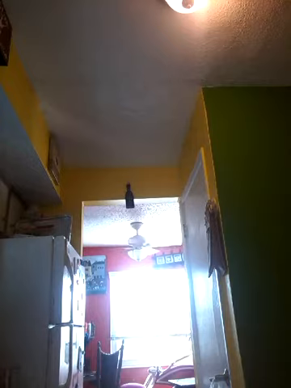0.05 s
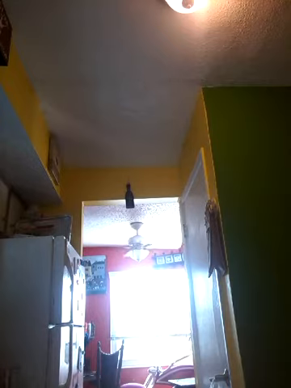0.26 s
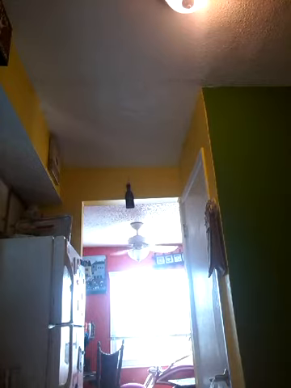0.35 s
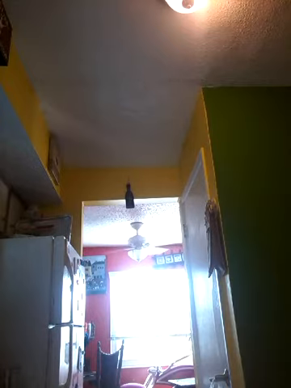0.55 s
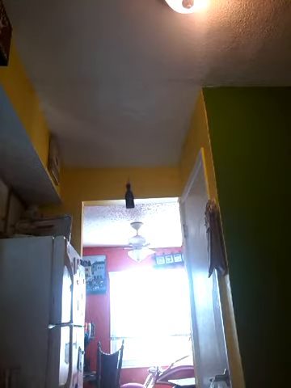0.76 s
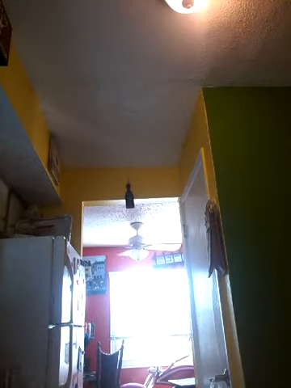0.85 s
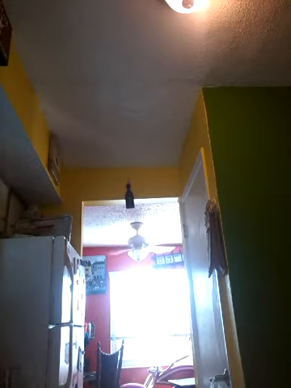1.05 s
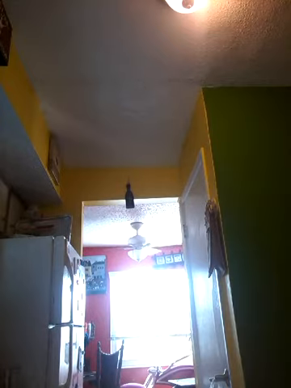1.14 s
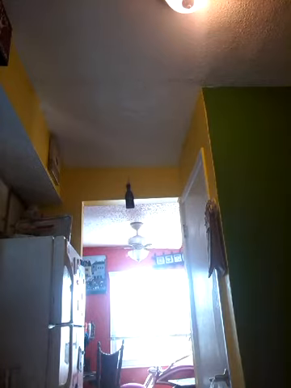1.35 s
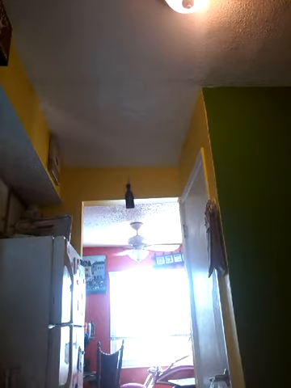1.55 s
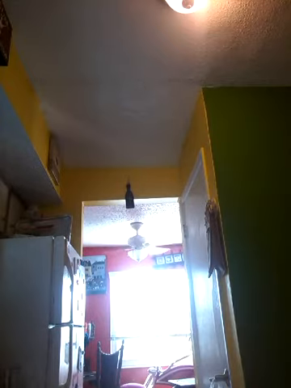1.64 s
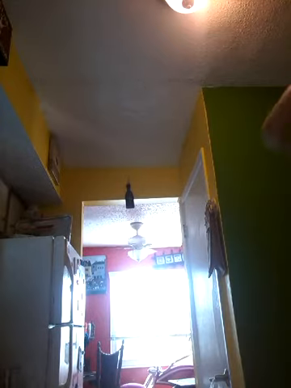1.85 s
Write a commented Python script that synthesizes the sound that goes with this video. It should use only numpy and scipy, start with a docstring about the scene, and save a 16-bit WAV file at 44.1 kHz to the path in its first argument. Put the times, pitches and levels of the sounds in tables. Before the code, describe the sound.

Hollow wooden thuds and sharp knocks come in quick clusters with light metallic rattles, then a rough sliding scrape ends in a clack; short hard room reverberation, stereo, with faint low room noise afterwards.

```python
"""A wooden kitchen drawer bumps and booms as someone rummages in it, a few steps from the microphone.
Jolts are short sine booms with box modes; knocks are coloured clicks that set the contents ringing.
Utensils clink as close dying sines and rattle as flurries of tiny impacts. The runners rub, scrape
and hiss as dense random slips; the drawer slides shut with a clack.
A small hard kitchen smears every contact, over faint room noise and a low rumble."""
import sys
import numpy as np
from scipy import signal
from scipy.fft import rfft, irfft
from scipy.io import wavfile
from scipy.ndimage import uniform_filter1d

SR = 44100
rng = np.random.default_rng(int(sys.argv[2]) if len(sys.argv) > 2 else 0)


def waveform_to_disk(signal):
    """Save audio, clipped to [-1, 1], as 16-bit WAV at the path in sys.argv[1]."""
    frames = np.transpose(np.atleast_2d(signal))
    scaled = np.clip(frames, -1, 1) * 32767
    samples = np.round(scaled).astype(np.int16)
    wavfile.write(sys.argv[1], SR, samples)


N = 83790  # length in samples, 1.9 s


def amp(db):
    """Decibels to gain."""
    return 10 ** (np.asarray(db) / 20)


def read(points, hz):
    """Reads a spectrum on a log-frequency axis."""
    f, value = np.transpose(points)
    return np.interp(np.log(hz + 1), np.log(f + 1), value)


def level(points, column=1):
    """A dB curve over time as a gain for each sample."""
    rows = np.array(points)
    return amp(np.interp(np.arange(N) / SR, rows[:, 0], rows[:, column]))


def evened(x):
    """Scales to rms 1."""
    return x / np.sqrt(np.mean(x ** 2) + 1e-20)


def unit(x):
    """Scales to a mean energy of 1 per channel."""
    return x / np.sqrt(np.sum(x ** 2) / len(np.atleast_2d(x)) + 1e-20)


def add(mix, s, sound):
    """Mixes a sound in at a time in seconds."""
    start = max(round(s * SR), 0)
    part = mix[..., start:][..., :sound.shape[-1]]
    part += sound[..., :part.shape[-1]]


def convolve(x, response):
    """Passes a sound through a response."""
    return signal.fftconvolve(np.atleast_2d(x), np.atleast_2d(response), axes=1)[:, :N]


def click(points, size=2048):
    """A minimum-phase click: the given spectrum with its energy as early as possible."""
    hz = abs(np.fft.fftfreq(size, 1 / SR))
    log_gain = np.log(amp(read(points, hz)))
    spectrum = np.exp(np.conj(signal.hilbert(log_gain)))
    return np.fft.ifft(spectrum).real[:size // 2]


def ring(modes):
    """Half a second of the dying sines of a struck object."""
    t = np.arange(SR // 2) / SR
    out = np.zeros(len(t))
    for hz, db, t60 in modes:
        decay = np.exp(-np.log(1000) * t / t60)
        out += amp(db) * decay * np.sin(2 * np.pi * hz * t)
    return out


def contacts(size, rate, spread_db):
    """Random tiny impacts of either sign and uneven strength, at a mean rate per second."""
    chance, sign, strength = rng.random((3, size))
    heights = amp(-spread_db * np.log(strength + 0.06))
    return (chance < rate / SR) * np.sign(sign - .5) * heights


def bumps():
    """The drawer box jolts: each jolt booms briefly and leaves the wooden box ringing."""
    # jolts: t/s, level/dB, f/Hz of the boom, box ringing relative to the jolt/dB
    jolts = [(.043, -37.5, 316, 9), (.070, -27, 320, 6.5), (0.13, -54, 286, 0), (.227, -18, 346, -1),
             (.265, -25, 299, 5), (0.343, -29.5, 316, 16), (.377, -16.5, 238, -8), (0.3932, -9, 318, -2),
             (0.423, -29, 192.5, -24), (0.443, -17.5, 190, 2), (.456, -19, 272, 8.5),
             (.476, -18.5, 173, 6.5), (.499, -15.5, 302, -0.5), (0.564, -29.5, 273, -9),
             (0.599, -33.5, 314, 7), (0.648, -20, 298, -1), (0.655, -31, 195, -27), (0.674, -17, 198, -7),
             (.697, -19.5, 310, 5), (.713, -16.5, 311, -29), (.731, -14.5, 305, 2.5), (.885, -22, 303, 6.5),
             (.945, -26, 284, -35), (0.965, -24, 242, 2.5), (1.067, -26, 504, -14), (1.250, -18, 312, -35),
             (1.439, -67, 256, 1)]
    # modes of the box: f/Hz, level/dB, t60/s
    box_modes = [(129, -21.5, 0.38), (178.2, -13.5, 0.25), (280, -62, 0.18), (318, -14, 0.46),
                 (330, -24, 0.16), (403.4, -20.5, .25), (471, -24.5, 0.19)]
    rise_s, fall_s = 0.0048, 0.0059
    wet_db, low_cut_hz = -11, 141

    out, box = np.zeros((2, N)), ring(box_modes)
    t = np.arange(len(box)) / SR
    swell = np.minimum(t / rise_s, 1) / (1 + (t / (rise_s + fall_s)) ** 4)
    for s, db, hz, ring_db in jolts:
        boom = swell * np.sin(2 * np.pi * hz * t)
        echo = unit(convolve(boom, kitchen()))[:, :len(t)] * np.linalg.norm(boom)
        add(out, s, amp(db) * (boom + amp(ring_db) * box + amp(wet_db) * echo))
    low_cut = signal.butter(3, low_cut_hz, "high", fs=SR, output="sos")
    return signal.sosfilt(low_cut, out)


def knocks(gain_db=37):
    """Hard contacts on wood, each a click of its own colour, set the drawer's contents ringing."""
    # blows, ahead of the common gain: t/s, thud/dB, body/dB, crack/dB, tick/dB
    blows = [(.062, -44.5, -38.5, -59, -61), (0.072, -64, -39, -54.5, -61), (0.092, -50, -48, -55, -65),
             (0.17, -68, -51, -62, -56.5), (.224, -32.5, -31.5, -35.5, -39), (0.379, -24, -28.5, -54, -66),
             (.393, -33, -25, -56.5, -52), (.412, -19.5, -21, -55, -56), (0.449, -54, -31, -31, -50.5),
             (0.4563, -35.5, -26.5, -35.5, -57), (.467, -39, -42, -53, -64), (0.502, -41, -33, -48, -67),
             (.507, -59, -34, -51, -64), (0.646, -44.5, -32, -30, -58), (.649, -28.5, -23.5, -24.5, -46.5),
             (.655, -29, -20.5, -26, -36.5), (.661, -46.5, -27.5, -27.5, -47), (0.679, -49, -24, -31, -61),
             (.735, -39.5, -23, -36, -46), (0.783, -66, -24.5, -40, -36), (.883, -67.5, -22, -41, -53),
             (.969, -36.5, -28.5, -40, -53), (1.005, -68, -25.5, -36, -61), (1.221, -79, -26.5, -23, -61),
             (1.249, -28, -23, -23, -36.5), (1.2538, -26.5, -28, -21, -32),
             (1.500, -55.5, -54.5, -54, -58.5)]
    # centres of thud, body, crack and tick: f/Hz
    band_hz = [150, 750, 2400, 8000]
    # shared colour of struck wood: f/Hz, level/dB
    wood = [(30, -45), (70, -24), (120, 8), (200, 7.5), (500, 6.5), (1000, 3), (2000, 1), (3500, -5.5),
            (5500, -4.5), (7800, -12.5), (10500, -9.5), (16000, -24)]
    # what rings on inside the drawer: f/Hz, relative level/dB, t60/s
    contents = [(558, 0, .3), (646, -2, .27), (921, -8, .15), (1020, -8, .15), (1098, -7, .15),
                (1190, -4, .17), (1543, -6, .13), (1890, -6, .14), (2050, -6, .14), (2174, -5, .15),
                (2571, -8, .17), (3367, -16, .15), (5290, -18, .25), (5520, -16, .28)]
    contents_db = -23  # relative to the blow

    out, rings = np.zeros((2, N)), amp(contents_db) * unit(ring(contents))
    for s, *band_db in blows:
        blow = convolve(click(wood), click(list(zip(band_hz, band_db))))
        sound = convolve(blow, kitchen())
        add(out, s, sound)
        add(out, s, convolve(sound, rings))
    return amp(gain_db) * out


def clinks():
    """Struck utensils ring in tight clusters of modes that beat together."""
    # strikes: t/s, f/Hz, level/dB
    strikes = [(.228, 1020, -34.5), (.228, 2140, -34), (.503, 905, -32.5), (.738, 1200, -38.5),
               (.885, 745, -31), (0.459, 1380, -38), (.995, 1140, -33), (1.005, 2080, -38),
               (1.256, 1200, -27), (1.256, 5460, -47)]
    # close modes of one utensil: multiple of the pitch, level/dB
    split = [(.968, -4), (.988, -2), (1, 0), (1.016, -3)]
    # decay by pitch: f/Hz, t60/s
    decay = [(800, .19), (2000, .22), (5500, .37)]

    out = np.zeros((2, N))
    for s, hz, db in strikes:
        t60 = read(decay, hz)
        tone = ring([(hz * ratio, d, t60) for ratio, d in split])
        near = unit(convolve(tone, kitchen(size=512)))  # only the first 12 ms of the room
        add(out, s, amp(db) * np.linalg.norm(tone) * near)
    return out


def rattles():
    """Utensils jostle: short flurries of bright random clicks, fading over their second half."""
    # flurries: t/s, length/s, level/dB, treble tilt/(dB per octave)
    flurries = [(0.221, 0.017, -33, 2), (0.232, .035, -36.5, -6), (0.296, 0.24, -49.5, -2),
                (0.379, 0.022, -40.5, 0), (0.693, 0.043, -40, 0.5), (0.73, 0.011, -36, 5.5),
                (0.755, .02, -37.5, -4), (0.789, 0.0073, -40, 5.5), (0.889, 0.038, -41.5, 0.5),
                (0.939, 0.028, -49, -2), (0.99, 0.084, -48.5, 2), (1.07, 0.053, -48, -2.5),
                (1.154, 0.036, -37.5, -8.5)]
    # colour of the utensils: f/Hz, level/dB
    utensils = [(200, -41), (900, 6), (2000, 1.5), (3500, 2), (5500, 3.5), (7800, -6), (10500, -6),
                (13000, -9.5), (16000, -16)]
    rate_per_s, spread_db = 630, 2

    out = np.zeros((2, N))
    t = np.arange(SR // 8) / SR
    for s, length, db, tilt_db in flurries:
        fade = np.clip(2 * (1 - t / length), 0, 1)
        flurry = contacts(len(t), rate_per_s, spread_db) * fade
        # the tilt pivots at 6 kHz
        colour = click([(hz, d + tilt_db * np.log2(hz / 6000)) for hz, d in utensils])
        sound = unit(convolve(convolve(flurry, colour), kitchen()))
        add(out, s, amp(db) * np.sqrt((length + 0.011) * SR) * sound)  # longer flurries carry more energy
    return out


def slide():
    """Friction of the runners: tiny random slips make a hollow resonant rub, a scrape and a hiss."""
    # levels ahead of the mix and the room: t/s, rub/dB, scrape/dB, hiss/dB
    friction = [(0, -52.5, -62.5, -89), (.16, -70, -68, -86), (.195, -48.5, -48.5, -84),
                (.22, -42.5, -41, -37.5), (.26, -40.5, -39, -44.5), (.32, -51, -50, -63),
                (.43, -48, -43.5, -58), (.52, -53, -68, -75), (.55, -59, -92, -97), (.87, -66, -55, -77),
                (.92, -43, -71, -74), (.955, -34.5, -44.5, -56), (1.01, -34, -42.5, -47),
                (1.045, -35.5, -41.5, -54), (1.14, -36.5, -41.5, -58), (1.165, -40, -33, -44),
                (1.21, -34, -30.5, -39), (1.25, -33, -30.5, -32.5), (1.265, -56, -53, -59),
                (1.6, -71.5, -74.5, -78)]
    # colour of the rub: f/Hz, level/dB
    runner = [(60, -31), (150, -10), (300, -5), (480, 5), (640, 5.5), (800, 1.5), (1100, 0), (1800, -13),
              (2600, -6.5), (5000, -24), (16000, -52)]
    # colour of the scrape: f/Hz, level/dB
    scrape_colour = [(200, -55), (900, -0.5), (1500, -1), (2900, -3.5), (4000, -14), (8000, -23.5),
                     (16000, -50)]
    # colour of the hiss: f/Hz, level/dB
    hiss_colour = [(500, -16), (3000, 4.5), (4400, -3), (5800, 5), (7800, -7), (10500, -3), (16000, -13.5)]
    # resonances of the sliding drawer: f/Hz, relative level/dB, t60/s
    drawer_modes = [(465, -2, .05), (525, -5, .06), (810, -2, .07), (1095, 2, .06), (1435, -1, .06),
                    (1840, 3, .05), (2060, 2, .05)]
    slips_per_s, spread_db = 1000, 2
    hollow_db = -1  # relative to the full rub

    layers = []
    for column, colour in enumerate([runner, scrape_colour, hiss_colour], 1):
        slips = convolve(contacts(N, slips_per_s, spread_db), click(colour))
        layers.append(evened(slips) * level(friction, column))
    rub, scrape, hiss = layers
    hollow = amp(hollow_db) * unit(convolve(rub, ring(drawer_modes))) * np.linalg.norm(rub)
    return convolve(rub / 2 + hollow + scrape + hiss, kitchen())


def kitchen(size=24576):
    """A small hard room: a weak direct sound, clumped early echoes, then a tail that dies by band."""
    # decay of the room: f/Hz, t60/s
    room_t60 = [(150, 0.47), (400, 0.21), (1040, 0.32), (2760, 0.27), (7280, 0.27), (15000, 0.16)]
    early_s, early_db, build_s = 0.013, -1.5, 0.0019  # early boost and build-up of the echoes
    clump_db, clump_fade_s = 3, 0.028
    direct_db = -15  # relative to all echoes together

    t = np.arange(size) / SR
    hz, when, z = signal.stft(pair(size), SR, nperseg=256)
    decay = amp(-60 * when / read(room_t60, hz)[:, None])
    tail = signal.istft(z * decay, SR)[1][:, :size]
    wander = evened(uniform_filter1d(rng.standard_normal(size), size=64))
    clumps = amp(clump_db * np.exp(-t / clump_fade_s) * wander)
    build = 1 - np.exp(-t / build_s)
    early = 1 + amp(early_db) * np.exp(-(t / early_s) ** 2)
    echoes = unit(tail * clumps * build * early)
    return echoes + amp(direct_db) * (t == 0)


def pair(size):
    """Diffuse noise at two microphones: alike in the bass, nearly unrelated in the treble."""
    # likeness of the channels: f/Hz, left-right correlation
    likeness = [(30, 0.99), (150, 1), (320, 0.97), (550, 0.19), (900, 0.13), (1900, -0.27), (4000, 0.038),
                (15000, -0.12)]
    a, b = rfft(rng.standard_normal((2, size)))
    same = np.clip(read(likeness, np.fft.rfftfreq(size, 1 / SR)), -1, 1)
    mid, side = a * np.sqrt((1 + same) / 2), b * np.sqrt((1 - same) / 2)
    return irfft([mid + side, mid - side], size)


def background():
    """Diffuse coloured noise: a steady room floor and a low rumble that swells and sinks."""
    # colour of the room noise: f/Hz, relative level/dB per Hz
    floor = [(15, -36), (25, -42), (53, -2.5), (71, -12.5), (107, 0.5), (160, -12.5), (227, -12),
             (389, -28), (469, -11.5), (582, -24), (848, -16.5), (919, -18.5), (15500, -37)]
    # level of the rumble: t/s, level/dB
    rumble_level = [(0, -53), (.15, -48), (.3, -37), (.6, -49.5), (.85, -37.5), (1.1, -45.5), (1.2, -44.5),
                    (1.35, -50), (1.5, -61), (1.66, -66), (1.79, -59.5), (1.9, -76)]
    # colour of the rumble: f/Hz, relative level/dB
    rumble_colour = [(25, -37.5), (50, -34.5), (75, -8), (110, -6.5), (200, 2.5), (330, -1.5), (600, -18.5),
                     (2000, -39.5)]
    floor_db = -58.5
    room_noise = amp(floor_db) * evened(convolve(pair(N), click(floor, size=8192)))
    rumble = level(rumble_level) * evened(convolve(pair(N), click(rumble_colour, size=8192)))
    return room_noise + rumble


def scene():
    """The drawer, leaning left or right by frequency, in the quiet kitchen."""
    # stereo lean of the drawer: f/Hz, left minus right/dB
    tilt = [(100, 0), (320, -1.5), (600, -6.5), (1200, 2), (2800, -0.5), (5500, -0.5), (8000, -1.5),
            (10500, -9.5), (14000, -2)]
    drawer = bumps() + knocks() + clinks() + rattles() + slide()
    lean_db = read(tilt, np.fft.rfftfreq(2 * N, 1 / SR)) / 2
    leaning = irfft(rfft(drawer, 2 * N) * amp([lean_db, -lean_db]))[:, :N]
    return leaning + background()


def record(dry):
    """The recorder's band limit: a steep low-pass."""
    edge_hz = 15950
    low_pass = signal.firwin(511, edge_hz, window=("kaiser", 9), fs=SR)
    return signal.oaconvolve(dry, low_pass[None], "same")


dry = scene()
out = record(dry)
waveform_to_disk(out)
```